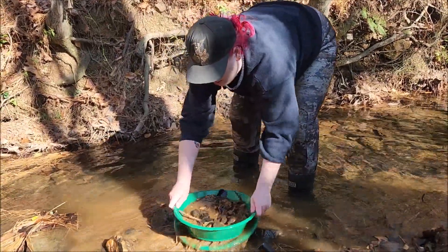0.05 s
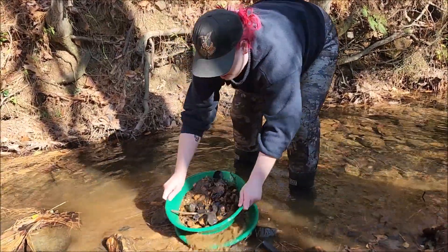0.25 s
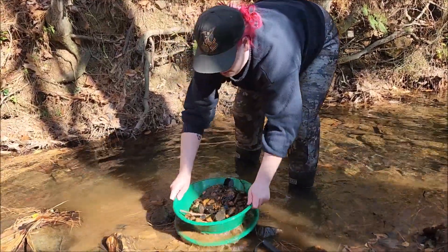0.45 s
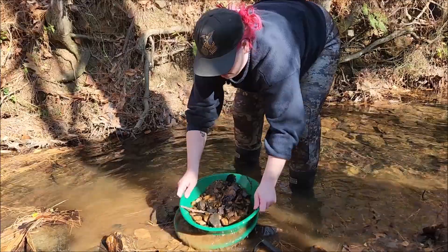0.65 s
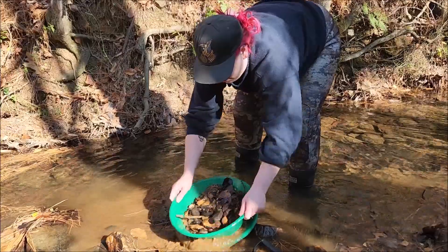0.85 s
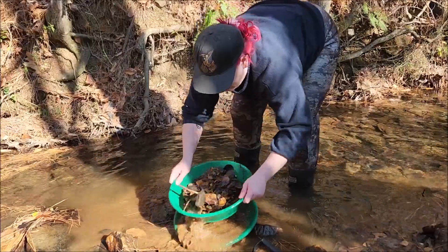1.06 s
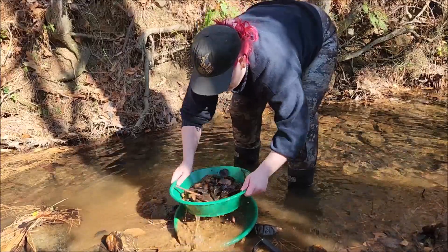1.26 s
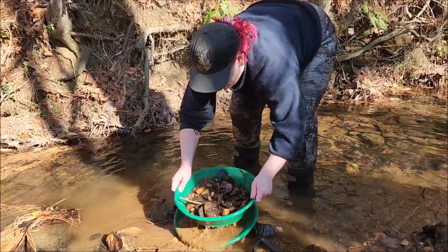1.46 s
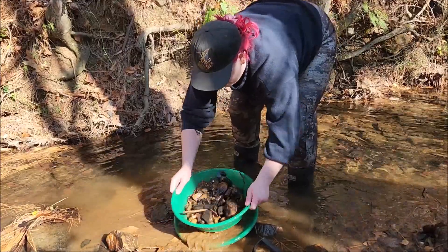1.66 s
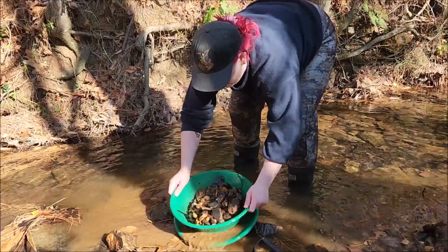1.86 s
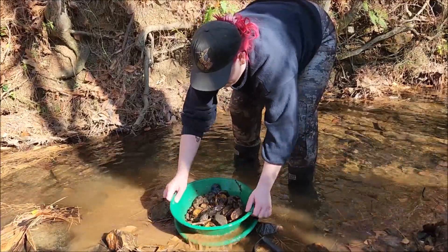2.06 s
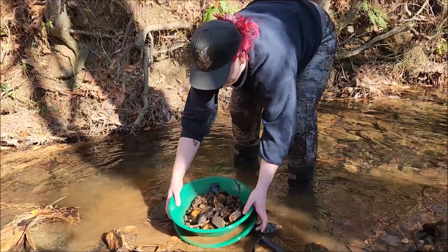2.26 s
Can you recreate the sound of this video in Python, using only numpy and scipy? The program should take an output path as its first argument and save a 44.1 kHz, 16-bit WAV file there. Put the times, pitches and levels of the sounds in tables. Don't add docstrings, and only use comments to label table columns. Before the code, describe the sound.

Sieving gravel at a creek: stones clatter against a plastic bowl while water sprays and drains

```python
import sys
import numpy as np
from scipy import signal
from scipy.fft import rfft, irfft
from scipy.io import wavfile

SR = 44100
rng = np.random.default_rng(int(sys.argv[2]) if len(sys.argv) > 2 else 0)


def to_wav(s):
    ch = np.atleast_2d(s).T
    pcm = np.round(np.clip(ch, -1, 1) * 32767)
    wavfile.write(sys.argv[1], SR, pcm.astype(np.int16))


def nominal_scale(level):
    x = np.asarray(level, float) / 20
    return 10 ** x


N = 101429
T = np.arange(N) / SR


def evened(x):
    return x / np.sqrt(np.mean(x ** 2) + 1e-20)


def read(points, size):
    hz, value = np.transpose(points)
    return np.interp(np.log(np.fft.rfftfreq(size, 1 / SR) + 1), np.log(hz + 1), value)


def causal(points):
    half = read(points, size=2048) * np.log(10) / 20
    log_spectrum = np.conj(signal.hilbert(np.r_[half, half[-2:0:-1]]))
    return np.fft.ifft(np.exp(log_spectrum)).real[:1024]


def slow(hz):
    rates = np.geomspace(hz / 12, hz, num=20)
    return evened(sum(np.sin(2 * np.pi * (f * T + rng.random())) / np.sqrt(f) for f in rates))


def clicks(per_s, spread_db):
    size = nominal_scale(spread_db * np.minimum(rng.exponential(1, N), 5))
    size = size * (rng.random(N) < per_s / SR)
    return evened(size) * rng.choice([-1., 1.], (2, N))


# start_s, level_db
WIND_LEVEL = [(0.0, -41.5), (0.09, -47), (0.17, -43.5), (0.27, -45), (0.31, -41), (0.35, -50),
              (0.44, -44.5), (0.54, -61.5), (0.79, -46), (0.9, -59), (0.97, -50.5), (1.98, -50),
              (2.02, -57), (2.05, -48.5), (2.25, -52), (2.3, -47)]
# pitch_hz, level_db
WIND_SHAPE = [(15, -6), (30, 9.5), (65, 14), (100, 3.5), (200, -38)]


def wind():
    noise = rng.standard_normal((2, N))
    x = irfft(rfft(noise) * nominal_scale(read(WIND_SHAPE, size=N)), N)
    x = np.array([x[0], 0.82 * x[0] + 0.4 * x[1]])
    gust_db = np.interp(T, *np.transpose(WIND_LEVEL)) + 1.0 * slow(10)
    return nominal_scale(gust_db) * evened(x)


# pitch_hz, level_db (per Hz)
CREEK_SHAPE = [(120, -6.5), (400, -5.5), (1500, -3.5), (2900, -15), (4300, -12.5), (6500, -23.5),
               (11500, -23), (15500, -19)]
# start_s, level_db
CREEK_LEVEL = [(0, -43), (.45, -42.5), (1.1, -47.5), (1.4, -45.5), (2.05, -41), (2.2, -46.5), (2.3, -49.5)]


def creek():
    splashes = clicks(per_s=3500, spread_db=2.0)
    x = signal.oaconvolve(splashes, causal(CREEK_SHAPE)[None], axes=1)[:, :N]
    flow_db = np.interp(T, *np.transpose(CREEK_LEVEL)) + 1.2 * slow(19)
    return nominal_scale(flow_db) * evened(x)


# start_s, peak_s, end_s
STROKES = [(-.1, 0.015, 0.097), (0.027, 0.093, 0.17), (0.163, 0.243, 0.34), (0.271, 0.375, .43),
           (0.449, 0.498, .58), (0.588, 0.638, 0.75), (0.704, 0.745, 0.83), (.75, .82, 0.87),
           (0.83, 0.895, 0.75), (.895, 0.928, 0.99), (0.902, 0.998, 1.062), (1.079, 1.181, 1.354),
           (1.21, 1.287, 1.335), (1.362, 1.438, 1.58), (1.42, 1.5, 1.62), (1.561, 1.675, 1.804),
           (1.675, 1.806, 1.94), (1.841, 1.975, 2.028), (1.96, 2.022, 2.1), (2.075, 2.087, 2.13),
           (2.23, 2.265, 2.36)]
# stones_db, spray_db
FORCE = [(-41, -59), (-37.5, -52), (-28.5, -44), (-25.5, -39.5), (-23, -35.5), (-19.5, -30), (-20.5, -34),
         (-30.5, -42), (-23, -35), (-14, -24), (-25.5, -33.5), (-18.5, -25), (-17, -25), (-20, -25.5),
         (-23, -28), (-22.5, -29.5), (-25, -34.5), (-19, -28.5), (-28, -43.5), (-39.5, -71), (-48, -51)]


def effort(column, lag_s, steep):
    power = np.zeros(N)
    for (begin, peak, end), force in zip(STROKES, FORCE):
        side_s = np.where(T < peak + lag_s, peak - begin, end - peak)
        u = (T - peak - lag_s) / side_s
        power += nominal_scale(force[column] - 20 * steep * abs(u) ** 2.2) ** 2
    return np.sqrt(power)


# start_s, level_db
KNOCKS = [(0.063, -35), (0.089, -25), (0.118, -29), (0.191, -31), (0.199, -28), (0.227, -23), (0.242, -20),
          (0.32, -30), (0.373, -13.5), (0.478, -14.5), (0.486, -9.5), (0.61, -19), (0.617, -17),
          (0.645, -8.5), (0.71, -22), (0.729, -13.5), (0.743, -14), (0.761, -9.5), (0.823, -14.5),
          (0.858, -20.5), (0.878, -15), (0.899, -18), (0.913, -7.5), (0.928, -20), (0.949, -2.5),
          (0.957, -8.5), (1.037, -21), (1.101, -30), (1.114, -23), (1.13, -14.5), (1.16, -13), (1.177, -15),
          (1.219, -15), (1.242, -34), (1.259, -7), (1.277, -1.5), (1.293, -1.5), (1.322, -14.5),
          (1.343, -19), (1.347, -19), (1.389, -13.5), (1.414, -4.5), (1.422, -7.5), (1.459, -6),
          (1.496, -9), (1.528, -7.5), (1.58, -17.5), (1.615, -16), (1.667, -8), (1.746, -14.5),
          (1.785, -23), (1.897, -12.5), (1.972, -5), (2.039, -23), (2.051, -17), (2.09, -24), (2.143, -29),
          (2.158, -21.5), (2.256, -31), (2.286, -27.5)]


def big_stones():
    out = np.zeros((2, N))
    for s, db in KNOCKS:
        at = round(s * SR)
        out[0, at] = out[1, at + rng.integers(8, 30)] = nominal_scale(db)
    return out


# pitch_hz, level_db, t60_s
BOWL = [(194, -33.5, 0.026), (378, -26.5, 0.017), (543, -17, 0.025), (793, -17.5, 0.015), (1066, -9, 0.011),
        (1451, -4, 0.02), (1640, -2, 0.015), (1990, -12, 0.017), (2354, -8, 0.011), (2950, -12.5, 0.0032),
        (3982, -5.5, 0.0064), (4597, -10.5, 0.0076)]


def bowl_ring(t):
    ring = np.zeros(len(t))
    for m, (hz, db, t60) in enumerate(BOWL):
        decay = nominal_scale(db - 60 * t / t60 + 3.85 * rng.standard_normal())
        patch_hz = hz * (1 + 0.097 * rng.uniform(-0.95, 1))
        ring += (-1) ** m * decay * np.sin(2 * np.pi * patch_hz * t)
    ring *= 1 - np.exp(-t / 0.00027)
    return ring / abs(ring).max()


def stones(shower):
    knock_db, clatter_s = 2.5, 0.0014
    impacts = np.array([shower, big_stones()])
    patch = rng.integers(0, 16, N)
    rung = np.zeros((2, 2, N))
    for k in range(16):
        ring = bowl_ring(T[:1500])
        rung += signal.oaconvolve(impacts * (patch == k), ring[None, None], axes=2)[..., :N]

    lag = T[:500] / clatter_s
    clatter = (rng.random((2, 500)) < .03) * rng.standard_normal((2, 500)) * lag * np.exp(1 - lag ** 2)
    clatter[:, 0] = 1.7
    clatter = clatter / np.linalg.norm(clatter, axis=1)[:, None]
    big = signal.oaconvolve(rung[1], clatter, axes=1)[:, :N]
    big = signal.lfilter(*signal.butter(2, [804, 2780], "band", fs=SR), big)

    both = effort(column=0, lag_s=0, steep=1) * evened(rung[0]) + nominal_scale(knock_db) * big
    return signal.sosfilt(signal.butter(2, 130, "high", fs=SR, output="sos"), both)


# pitch_hz, level_db
SPRAY = [(2000, -8.5), (5000, -1), (6500, -6), (7600, -3.5), (8800, -7), (11500, -2.5), (13500, -10),
         (15500, -9.5)]


def spray(shower):
    stone_tick_db, flicker_db = -9, 0.5
    grains = clicks(per_s=9000, spread_db=3.0) + nominal_scale(stone_tick_db) * shower
    fizz = evened(signal.oaconvolve(grains, causal(SPRAY)[None], axes=1)[:, :N])
    flicker = nominal_scale(flicker_db * slow(49.58))
    return effort(column=1, lag_s=0.003, steep=1.23) * flicker * fizz


# start_s, level_db, pitch_hz, ring_db (over the burst)
TICKS = [(.016, -32, 11100, 7), (.022, -28.5, 9100, 6), (.029, -30.5, 4460, 16), (.061, -35, 10500, 10),
         (.073, -34, 7800, 13), (.087, -29, 9000, 3), (.108, -25, 4150, 14), (.122, -32.5, 10000, 1),
         (.129, -36, 9000, 6), (.142, -38, 11000, 6), (.194, -30.5, 5000, 4), (.2, -30, 4670, 13),
         (.227, -20, 4000, 8), (.476, -26, 4600, 10), (.485, -20, 4000, 16), (.505, -26, 8900, 6),
         (.535, -31, 11500, 10), (.644, -11, 4050, 15), (.742, -22, 7950, 9), (.917, -14, 11000, 12),
         (1.178, -17, 4300, 24), (1.326, -24, 11000, 4.5), (1.344, -20, 4540, 9), (1.397, -20, 3900, 9),
         (1.416, -16, 11030, 11), (1.713, -13, 10600, 9.5), (1.746, -20, 4400, 18), (1.962, -23, 11000, 21),
         (2.006, -31, 11000, 9), (2.043, -29, 8500, 10), (2.053, -22.5, 14500, 10), (2.089, -34, 14500, 6),
         (2.114, -48, 4600, 11), (2.125, -28.5, 15000, 8), (2.159, -38, 4300, 8), (2.168, -38, 14400, 7),
         (2.242, -36, 4380, 17.5), (2.254, -26, 11500, 3), (2.266, -43, 4600, 14), (2.287, -31.5, 10000, 0)]


def ticks():
    level_db, burst_t60, sharpness = -2, .011, 7.3
    tap = causal(SPRAY)[None]
    tap = tap / np.linalg.norm(tap) / 2
    out, t = np.zeros((2, N)), T[:400]
    for s, db, hz, ring_db in TICKS:
        noise = rng.standard_normal((2, 400)) * nominal_scale(-60 * t / burst_t60)
        burst = signal.oaconvolve(noise, tap, axes=1)[:, :400]
        ring = signal.lfilter(*signal.iirpeak(hz, sharpness, fs=SR), burst)
        burst = burst + nominal_scale(ring_db) * ring
        part = out[:, round(s * SR):][:, :400]
        part += nominal_scale(db + level_db) * burst[:, :part.shape[1]]
    return out


# peak_s, half_length_s, lowest_hz, highest_hz, level_db
SLOSHES = [(0.049, 0.059, 358, 704, -45.5), (0.371, 0.038, 300, 593, -46), (0.495, 0.04, 296, 620, -36),
           (2.06, .03, 110, 395, -41), (2.22, 0.037, 147, 230, -50), (0.289, 0.0277, 111, 220, -48),
           (0.136, 0.031, 530, 1290, -35.5), (0.764, 0.029, 129, 605, -35), (0.951, 0.036, 268, 680, -28.5),
           (0.999, 0.05, 118, 329, -35), (1.279, 0.057, 151, 840, -34), (1.498, 0.053, 90, 333, -36.5),
           (1.528, 0.0147, 206, 890, -29), (1.79, 0.043, 109, 298, -40.5), (1.969, 0.041, 109.2, 690, -41),
           (2.29, 0.036, 255, 490, -46)]


def sloshes():
    gulps_per_s, gulp_cycles = 800, 3.64
    out, t = np.zeros((2, N)), T[:2600]
    for s, half, low_hz, high_hz, db in SLOSHES:
        draw, crowd = rng.random((80, 4)), np.zeros(N)
        freed = draw[:, 3] < gulps_per_s * 2.4 * half / 80
        for at, pitch, size, _ in draw[freed]:
            hz = low_hz * (high_hz / low_hz) ** pitch
            swell = nominal_scale(10.0 * size) * t * hz * np.exp(-t * hz * 3.2 / gulp_cycles)
            gulp = swell * np.sin(2 * np.pi * hz * t * (1 + 0.035 * hz * t))
            part = crowd[int((s + half * (2.4 * at - 1.2)) * SR):][:len(t)]
            part += gulp[:len(part)]
        bell = nominal_scale(-20 * ((T - s) / half) ** 2)
        loudness = np.sqrt(np.sum((bell * crowd) ** 2) / np.sum(bell ** 2) + 1e-20)
        pair = np.array([crowd, np.roll(crowd, 150)])
        out += nominal_scale(db) * bell * pair / loudness
    return out


# start_s, pitch_hz, level_db, t60_s
BUBBLES = [
    (.271, 372, -14.5, .055),
    (.122, 800, -32, .05),
    (.115, 365, -31, .09),
    (.94, 390, -24, .05),
]


def bubbles():
    rise_s, glide_per_s = .009, .9
    out = np.zeros(N)
    for s, hz, db, t60 in BUBBLES:
        t = np.maximum(T - s, 0)
        swell = nominal_scale(db - 60 * t / t60) * (1 - np.exp(-(t / rise_s) ** 2))
        out += swell * np.sin(2 * np.pi * hz * t * (1 + glide_per_s * t))
    return np.array([out, out])


# pitch_hz, likeness (0 to 1)
SAME = [(100, 0.96), (600, 0.97), (1300, 0.87), (2400, 0.73), (4400, 0.42), (8000, 0.13), (15000, 0.36)]
# pitch_hz, level_db
LEAN = [(30, -3), (130, -1), (290, 0.5), (640, -1.5), (1410, -0.5), (3100, 9.5), (5500, -1), (9500, 4.5),
        (14000, -2)]
# pitch_hz, phase_rad
LEAD = [(100, -0.32), (700, 0.46), (1500, 0.66), (2670, 1.45), (3700, -0.63), (5000, 0.55), (8000, 1.88)]


def ports(pair):
    same = np.clip(read(SAME, size=N), 0, 1)
    left, other = rfft(pair)
    right = same * left * np.exp(-1j * read(LEAD, size=N)) + np.sqrt(1 - same ** 2) * other
    lean = nominal_scale(read(LEAN, size=N) / 2)
    return irfft(np.array([left * lean, right / lean]), N)


def bank(near):
    level_db, t60 = -13, 0.03
    t = T[:3000]
    tail = rng.standard_normal((1, 3000)) * nominal_scale(-60 * t / t60) * (t > .002)
    scatter = signal.oaconvolve(near, tail / np.linalg.norm(tail), axes=1)[:, :N]
    return near + nominal_scale(level_db) * scatter


def scene():
    shower = clicks(per_s=2600, spread_db=1.14) * nominal_scale(1.65 * slow(60))
    near = stones(shower) + spray(shower) + ticks() + sloshes() + bubbles()
    return ports(bank(near) + creek()) + wind()


def top_cut(x):
    return signal.sosfilt(signal.butter(12, 16980, fs=SR, output="sos"), x)


def record(dry):
    warm = np.tanh(dry * 1.11) / 0.97
    low_pass = signal.firwin(511, 15720, window=("kaiser", 7), fs=SR)
    mix = signal.oaconvolve(warm, low_pass[None], "same")
    return top_cut(mix)


dry = scene()
out = record(dry)
to_wav(out)
```